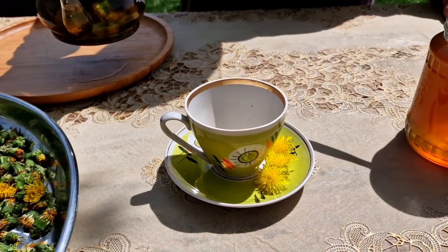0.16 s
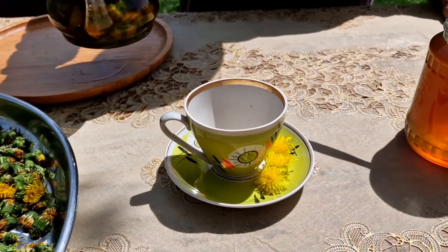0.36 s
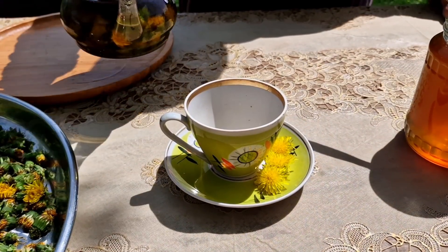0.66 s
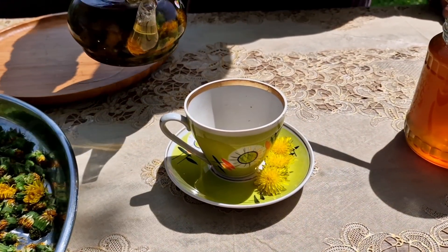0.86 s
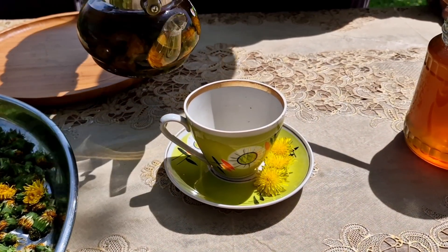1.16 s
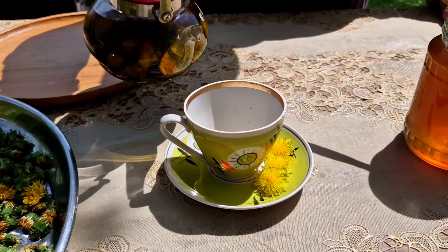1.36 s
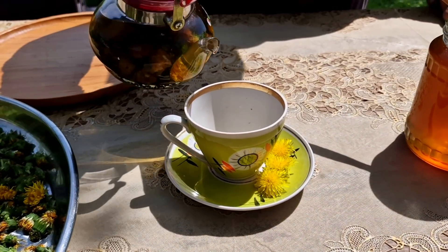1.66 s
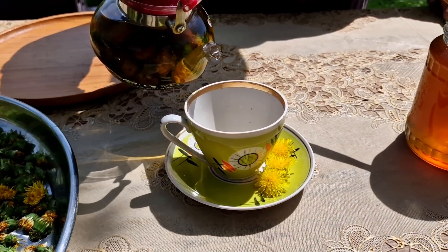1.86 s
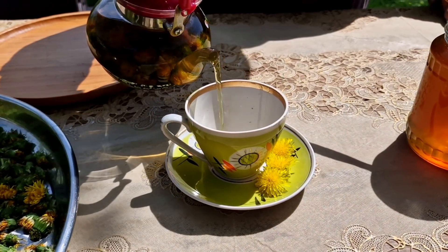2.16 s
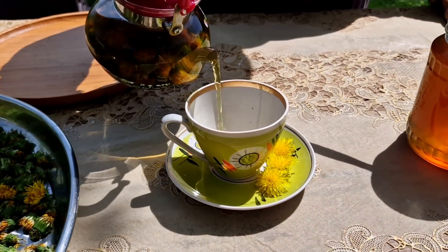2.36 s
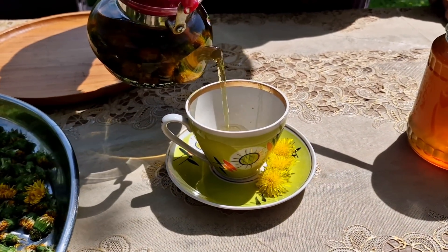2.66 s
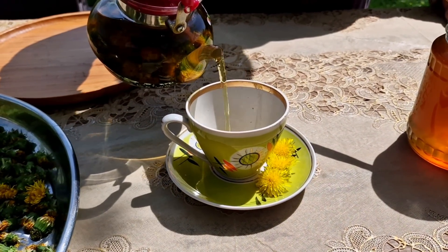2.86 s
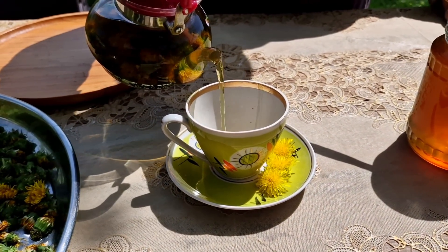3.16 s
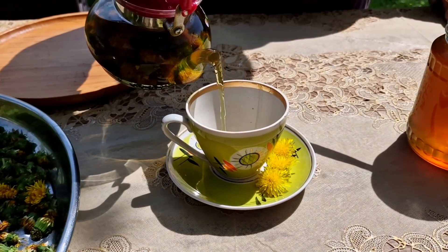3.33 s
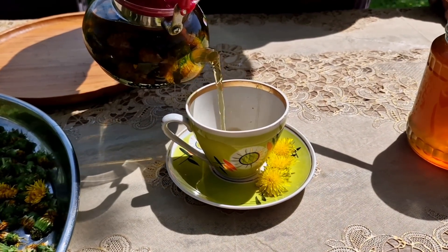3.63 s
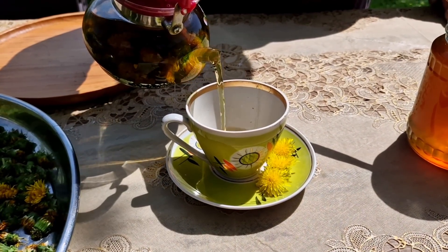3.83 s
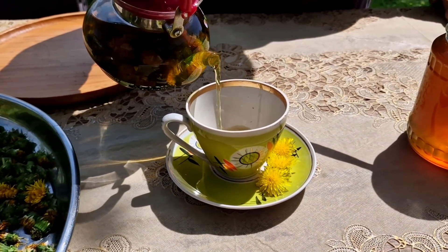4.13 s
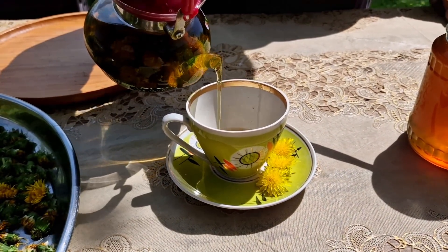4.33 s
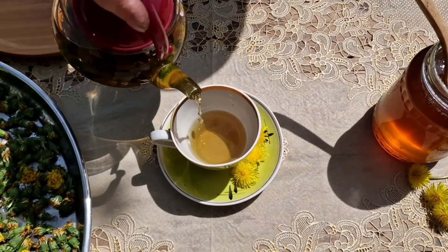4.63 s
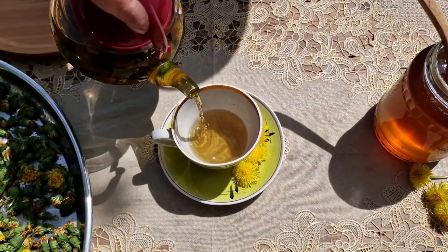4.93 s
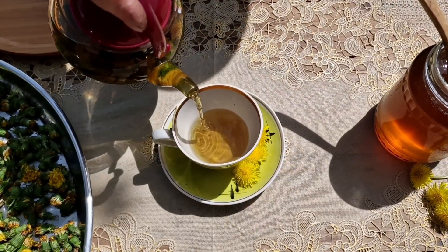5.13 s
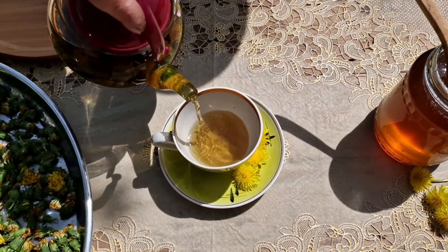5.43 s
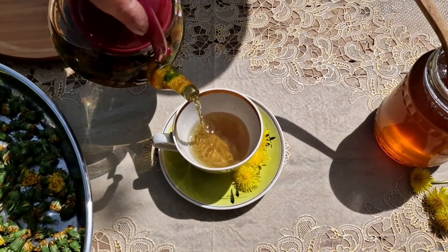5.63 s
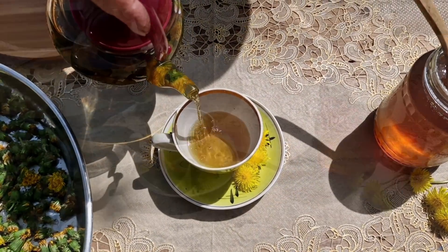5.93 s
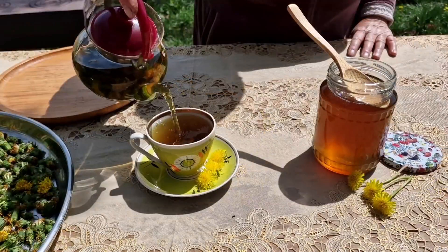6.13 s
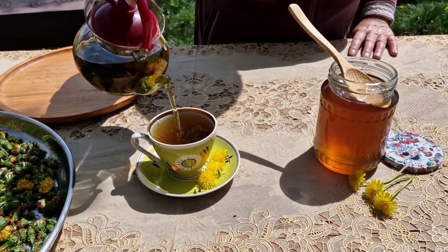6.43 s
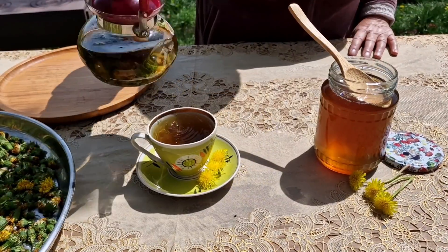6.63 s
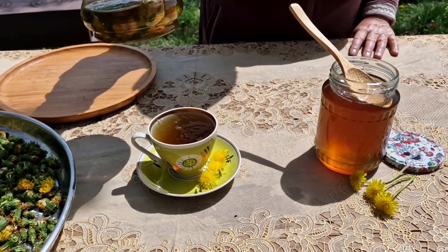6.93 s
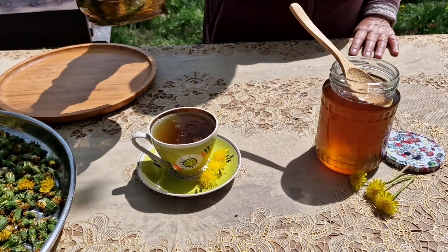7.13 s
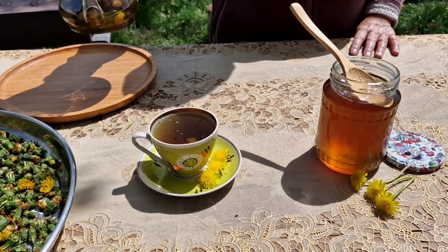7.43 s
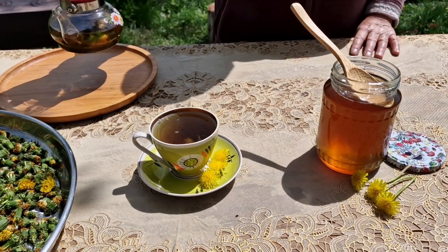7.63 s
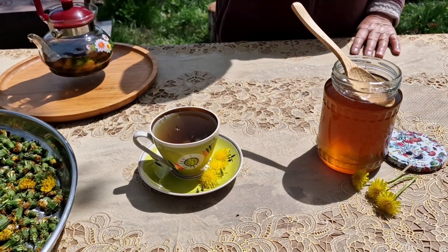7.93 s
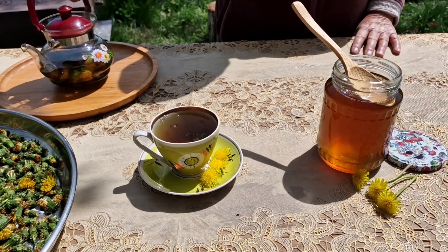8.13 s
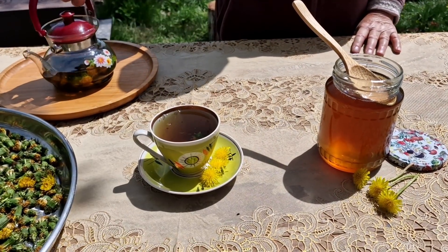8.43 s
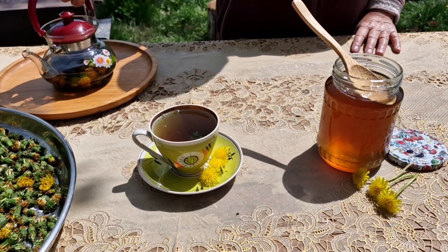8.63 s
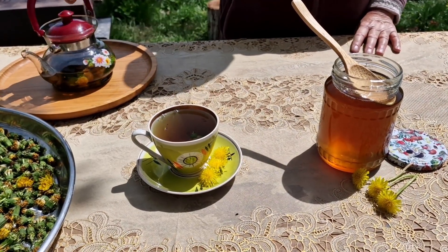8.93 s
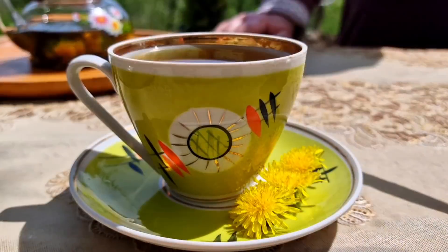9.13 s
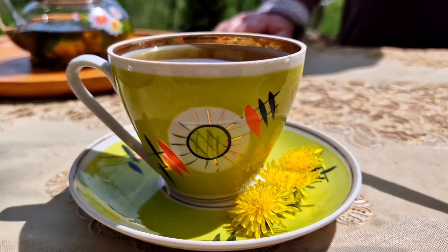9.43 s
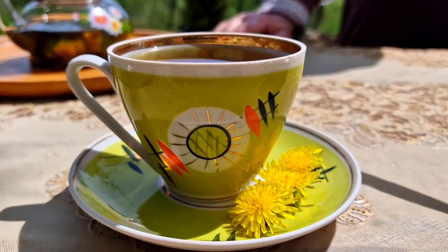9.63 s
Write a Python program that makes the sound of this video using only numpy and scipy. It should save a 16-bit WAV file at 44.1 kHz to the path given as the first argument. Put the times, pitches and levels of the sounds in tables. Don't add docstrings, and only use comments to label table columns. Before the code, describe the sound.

A stereo microphone by the table in a sunny rural yard picks up lumpy low wind, faint hum and distant bird chorus. Bright sparrow chirps and falling chick peeps surround a rasping rooster crow, answered faintly from afar. Small sharp drips ring in a porcelain cup, followed by delicate trickling and one final plop. Late on, a dull wooden knock comes, then harsh scolding on the right and a fast high trill.

```python
import sys
import numpy as np
from scipy import signal
from scipy.fft import rfft, irfft
from scipy.io import wavfile
from scipy.ndimage import uniform_filter1d

SR = 44100
rng = np.random.default_rng(int(sys.argv[2]) if len(sys.argv) > 2 else 0)


def unload_audio(sound):
    columns = np.transpose(np.atleast_2d(sound))
    steps = np.round(np.clip(columns, -1, 1) * 32767)
    wavfile.write(sys.argv[1], SR, steps.astype(np.int16))


def natural_amplitude(level_db):
    exponent = np.asarray(level_db, float) / 20
    return 10 ** exponent


N = 431298


def evened(x):
    return x / np.sqrt(np.mean(x ** 2) + 1e-20)


def read(points, hz):
    f, value = np.transpose(points)
    return np.interp(np.log(hz + 1), np.log(f + 1), value)


def curves(rows):
    s, *columns = np.transpose(rows)
    t = np.arange(s[0], s[-1], 1 / SR)
    return t, *(np.interp(t, s, c) for c in columns)


def add(mix, s, sound, pan_db=0, lag=0):
    for ear, sign in enumerate((1, -1)):
        part = mix[ear, round(s * SR) - sign * lag:][:len(sound)]
        part += sound[:len(part)] * natural_amplitude(sign * pan_db / 2)


def drift(size, hz):
    lowpass = signal.butter(2, hz, fs=SR, output="sos")
    return evened(signal.sosfilt(lowpass, rng.standard_normal(size)))


def noise(db, window, top_hz=SR / 2):
    # (frequency [Hz], likeness [0-1])
    likeness = [(30, 0.7), (70, 0.93), (200, 0.67), (600, 0.036), (1200, 0.024), (5000, 0.1)]
    hop = window // 4
    frames = N // hop + 5
    hz = np.fft.rfftfreq(window, 1 / SR)[:, None]
    used = hz[hz <= top_hz][:, None]
    a, b, c, d, patches = rng.standard_normal((frames, len(used), 5)).T
    patches = uniform_filter1d(patches, size=10, axis=0)
    patches = evened(uniform_filter1d(patches, size=8, axis=1))
    same = np.clip(read(likeness, used), -1, 1)
    left = a + 1j * b
    right = same * left + np.sqrt(1 - same ** 2) * (c + 1j * d)
    z = np.zeros((2, len(hz), frames), complex)
    z[:, :len(used)] = left, right
    z[:, :len(used)] *= natural_amplitude(db(used, np.arange(frames) * hop / SR) + .7 * patches)
    return signal.istft(z, nperseg=window, noverlap=window - hop)[1][:, :N]


def echoes(x, t60, gap_s):
    at = np.arange(round(gap_s * SR), SR // 3, 16)
    at = at + rng.integers(0, 16, (2, len(at)))
    taps = np.zeros((2, SR // 3 + 16))
    heights = rng.choice([-1., 1.], at.shape) * natural_amplitude(-60 * at / SR / t60)
    np.put_along_axis(taps, at, heights, 1)
    return signal.oaconvolve(x[:1], taps / np.linalg.norm(taps[0]), axes=1)[:, :x.shape[1]]


def note(start, length, first_hz, last_hz, db, bend=1., arch=0., edge_db=-.5):
    top_share = .37
    u = np.linspace(0, 1, num=16)
    top = top_share * (arch > 0)
    past = np.clip((u - top) / (1 - top), 0, 1)
    hz = last_hz + (first_hz - last_hz) * (1 - past) ** bend
    hz -= arch * first_hz * np.maximum(1 - u / top_share, 0) ** 2
    return np.transpose([start + length * u, hz, db + edge_db * (2 * u - 1) ** 4])


def whistle(rows, waver, second_db, hook=0., throb_hz=0., catch=0.):
    t, hz, level_db = curves(rows)
    hz = uniform_filter1d(hz, size=300) * (1 - hook * np.exp((t - t[-1]) / 0.01))
    turn = 2 * np.pi * np.cumsum(hz * (1 + waver * drift(len(t), 80))) / SR
    tone = np.sin(turn) + natural_amplitude(second_db) * np.sin(2 * turn)
    tone *= abs(np.cos(np.pi * throb_hz * (t - t[0] - .04))) ** .9
    tone *= 1 - catch * np.exp(-((t[-1] - t - .036) / 0.0015) ** 2)
    level = np.sqrt(2) * natural_amplitude(level_db + 3.85 * drift(len(t), 26))
    return t[0], level * tone * signal.windows.tukey(len(t), .15)


def wind():
    # (time [s], level [dB])
    gusts = [(0, -40.5), (.1, -55.5), (1.06, -61), (1.22, -52.5), (2.8, -62.5), (3.12, -49.5), (3.3, -58.5),
             (4.55, -49.5), (4.74, -34), (5.15, -65.5), (5.5, -50.5), (6.43, -53.5), (6.56, -44),
             (7.44, -54.5), (8.5, -45), (8.6, -53.5), (9.78, -53.5)]
    # (frequency [Hz], density [dB per Hz])
    rumble_curve = [(7.1, -44.5), (12, -14.5), (43, 8), (69, -2), (123, -16.5), (200, -32), (260, -25),
                    (440, -120)]
    s, level_db = np.transpose(gusts)
    rumble = evened(noise(lambda hz, t: read(rumble_curve, hz) + 0 * t, 4096, top_hz=500))
    gust_db = np.interp(np.arange(N) / SR, s, level_db)
    return rumble * natural_amplitude(gust_db + 2.9 * drift(N, 10.0)) * natural_amplitude([[.6], [-.6]])


def yard():
    # (start [s], far hum [dB], far bird chorus [dB])
    stretches = [
        (0, -72.5, -91.5),
        (4.4, -72.5, -87),
        (6.0, -69.5, -87),
        (9.0, -65, -84.5),
    ]
    # (frequency [Hz], density [dB per Hz])
    hum_curve = [(60, -16), (130, 1.5), (280, -2.5), (500, -6.5), (900, -12.5), (2000, -62)]
    chorus_curve = [(1200, -100.5), (2000, 8), (2600, 1.5), (3700, 7.5), (4600, -4.5), (5500, -4.5),
                    (8000, -23)]
    rustle_curve = [(100, -9), (400, -10), (1200, 3.5), (2200, -2), (4500, -30), (6000, -13), (8000, -11),
                    (9300, -23.5), (11000, -27), (12500, -20.5), (15600, -27.5), (15850, -71)]
    s, hum_db, chorus_db = np.transpose(stretches)
    fade_s = 0.058

    def stepped(t, db):
        changes = zip(s[1:], np.diff(db))
        return db[0] + sum(step * np.clip((t - at) / fade_s, 0, 1) for at, step in changes)

    def level_db(hz, t):
        hum = natural_amplitude(read(hum_curve, hz) + stepped(t, hum_db) - 5)
        chorus = natural_amplitude(read(chorus_curve, hz) + stepped(t, chorus_db) - 3.5)
        rustle = natural_amplitude(read(rustle_curve, hz) - 89.0)
        return 10 * np.log10(hum ** 2 + chorus ** 2 + rustle ** 2)
    return noise(level_db, 1024) * natural_amplitude([[.7], [-.7]])


def drones():
    # (start [s], end [s], frequency [Hz], level [dB], waver [share of pitch])
    tones = [
        (9.0, 9.77, 37, -49, .03),
        (4.42, 5.9, 465, -81, .03),
        (9.05, 9.77, 500, -78, .02),
        (6.1, 9.0, 7950, -97, .003),
    ]
    out = np.zeros((2, N))
    for start, end, hz, db, waver in tones:
        add(out, *whistle([(start, hz, db), (end, hz, db)], waver, second_db=-55))
    return out


def twitter():
    # (time [s], share calling [relative])
    calling = [(0, .3), (2.4, .5), (4.6, .4), (6.3, .8), (7.2, 1.5), (8.6, 1.2), (9.78, .6)]
    out = np.zeros((2, N))
    s, share = np.transpose(calling)
    for when, keep, pitch, glide, length, loud, side in rng.random((150, 7)):
        start = when * 9.6
        if keep * 1.5 < np.interp(start, s, share):
            hz, db = 3100 + 1700 * pitch, -77 + 8 * loud
            end = start + .01 + .02 * length
            rows = [(start, hz, db), (end, hz * (.65 + .4 * glide), db - 4)]
            add(out, *whistle(rows, waver=.05, second_db=-40), pan_db=8 * side - 4)
    return out


def tweets():
    # (start [s], length [s], first pitch [Hz], last pitch [Hz], level [dB])
    rows = [(.781, 0.065, 3500, 3950, -67.5), (.891, 0.048, 3660, 4360, -68.5),
            (.981, 0.18, 3590, 3626, -65), (1.241, 0.078, 5740, 3820, -69.5),
            (1.701, 0.05, 4880, 4700, -66.5), (1.755, 0.032, 4740, 3470, -66), (1.796, .1, 3350, 3405, -64),
            (2.18, 0.04, 4850, 4740, -67), (2.69, .07, 5500, 4900, -70), (5.135, 0.047, 7600, 5560, -71),
            (5.94, 0.028, 6000, 4860, -70), (7.14, .1, 4050, 4100, -70), (7.18, 0.13, 3470, 2870, -68),
            (7.57, .06, 3200, 3400, -71), (7.61, .07, 4200, 4150, -71), (8.5, .08, 4150, 4100, -73),
            (8.68, .03, 2050, 2050, -70), (8.92, .07, 4150, 4150, -70)]
    out = np.zeros((2, N))
    for row in rows:
        add(out, *whistle(note(*row), waver=.012, second_db=-40), lag=1)
    return out


def far_crows():
    # (start [s], length [s], first pitch [Hz], last pitch [Hz], level [dB])
    throbbing = [
        (2.473, 0.377, 587, 605, -62),
        (4.074, 0.337, 583, 597, -60.5),
    ]
    wavering = [
        (3.7, 0.098, 723, 668, -60),
        (6.37, 0.303, 708, 697, -73.5),
        (8.12, 0.36, 690, 686, -76.5),
    ]
    low, high = np.zeros((2, 2, N))
    for row in throbbing:
        add(low, *whistle(note(*row, edge_db=-1.5), waver=.008, second_db=-40, throb_hz=11.))
    for row in wavering:
        add(high, *whistle(note(*row, edge_db=10.5), waver=0.032, second_db=-68))
    return low, high


def trill(rows):
    t, hz, level_db = curves(rows)
    wobbles_per_s, wobble_top_s = 21.7, 9.065
    beat = 2 * np.pi * wobbles_per_s * (t - wobble_top_s) + 0.25 * drift(len(t), 11)
    low_hz = hz + 270 * np.cos(beat) - 500 * np.exp((t - t[-1]) / 0.011)
    middle_hz = 7600 + 90 * drift(len(t), 60)
    high_hz = 8250 - 300 * np.sin(beat)
    low, middle, high = (np.sin(2 * np.pi * np.cumsum(f) / SR) for f in (low_hz, middle_hz, high_hz))
    middle *= np.maximum(np.cos(beat + 2.2), 0) ** 2
    high *= np.maximum(np.cos(beat - .6), 0) ** 2
    voice = low + (.7 * middle + .6 * high) * natural_amplitude(4 * drift(len(t), 30))
    return t[0], natural_amplitude(level_db + 3.5 * drift(len(t), 25)) * voice * signal.windows.tukey(len(t), .2)


def trills():
    # (start [s], length [s], level [dB])
    rows = [
        (6.949, 0.13, -69),
        (9.035, 0.303, -50.5),
    ]
    layers = np.zeros((2, 2, N))
    for layer, (start, length, db) in zip(layers, rows):
        add(layer, *trill(note(start, length, 6825, 6825, db)), pan_db=4, lag=1)
    return layers


def near_whistles():
    # (start [s], length [s], first or top pitch [Hz], last pitch [Hz], level [dB])
    peeps = [(.63, 0.1, 2170, 1850, -65), (.93, 0.075, 2336, 2264, -66.5), (1.25, 0.021, 3166, 3030, -68),
             (1.384, 0.025, 3060, 2990, -66.5), (1.47, 0.044, 2950, 3720, -69),
             (1.52, 0.028, 3050, 2980, -67), (1.808, 0.17, 2100, 2810, -71.5),
             (2.209, 0.076, 2740, 2230, -70.5), (5.2, 0.033, 1805, 2290, -59.5),
             (5.33, 0.084, 2300, 2130, -66.5), (5.58, 0.042, 2210, 2053, -64),
             (5.84, 0.087, 2470, 2220, -67.5), (6.42, 0.063, 2700, 2250, -59),
             (6.72, 0.0985, 2920, 2325, -61), (6.849, 0.13, 3010, 2530, -60),
             (6.895, 0.0896, 2450, 2260, -59.5), (7.339, 0.11, 2570, 2364, -64.5),
             (7.447, 0.16, 3080, 3260, -74)]
    chicks = [(2.021, 0.066, 2886, 2636, -65), (2.431, 0.088, 2960, 2400, -62),
              (2.65, 0.14, 3370, 2465, -56.5), (2.922, 0.079, 3250, 2580, -61),
              (3.002, 0.11, 3092, 2572, -50), (6.038, 0.1, 3290, 2552, -46),
              (6.62, .125, 3598, 2530, -46.5), (6.957, 0.11, 3630, 2688, -46),
              (7.292, 0.081, 2570, 2323, -57)]
    arches = [(1.605, 0.17, 2653, 2388, -68), (3.163, 0.054, 3150, 2430, -59.5),
              (7.628, 0.1174, 2802, 2455, -57.5), (8.272, 0.0992, 2396, 2230, -61),
              (9.021, 0.075, 3360, 3370, -55.5), (9.311, 0.097, 3370, 3250, -53),
              (9.463, 0.135, 2436, 2130, -67.5), (9.5, 0.052, 2850, 2740, -67),
              (6.551, 0.094, 2525, 2196, -59.5), (9.585, 0.1, 3250, 3270, -59)]
    out = np.zeros((2, N))
    for row in peeps:
        add(out, *whistle(note(*row), waver=0.00867, second_db=-33, hook=0.07), lag=-8)
    for row in chicks:
        rows = note(*row, bend=5.5, edge_db=-8)
        add(out, *whistle(rows, waver=.01, second_db=-42, hook=.27, catch=.8), lag=-8)
    for row in arches:
        rows = note(*row, arch=.1095)
        add(out, *whistle(rows, waver=0.0027, second_db=-13.0, hook=0.176), lag=-2)
    return out


def scold():
    length_s = .04
    t = np.arange(round(length_s * SR)) / SR
    hz = 1850 + 400 * np.sin(np.pi * t / length_s)
    turn = 2 * np.pi * np.cumsum(hz * (1 + .09 * drift(len(t), 500))) / SR
    stack = .7 * np.sin(turn) + .4 * np.sin(1.5 * turn) + np.sin(2 * turn) + .35 * np.sin(2.5 * turn)
    return .45 * stack * (1 + .6 * drift(len(t), 400)) * np.sin(np.pi * (t / length_s) ** .7)


def scolds():
    # (time [s], peak [dB], left-right [dB])
    rows = [
        (9.079, -42.5, -11.5),
        (9.195, -38, -15.5),
    ]
    out = np.zeros((2, N))
    for s, peak_db, pan_db in rows:
        add(out, s, natural_amplitude(peak_db) * scold(), pan_db, lag=-2)
    return out


LEAD_S = .005


def chirp(tune, stretch):
    # (time from onset [s], pitch [Hz], level [dB])
    shape = [(0, 2997, -24.5), (.006, 4354, -2.5), (.0095, 5128, -13.5), (.013, 4253, -3),
             (.016, 3623, -7.5), (.0195, 4544, -14), (.025, 3400, -4), (.036, 3850, -14.5), (.05, 2636, -5)]
    t, hz, level_db = curves(np.multiply(shape, (stretch, 1, 1)))
    hz = uniform_filter1d(hz, size=60) * tune * (1 + 0.025 * drift(len(t), 400))
    turn = 2 * np.pi * np.cumsum(hz) / SR
    lift = np.exp(-((2 * hz - 8500) / 700) ** 2 - ((t - .015 * stretch) / .005) ** 2)
    octave = natural_amplitude(-21) * lift + natural_amplitude(-42)
    body = np.sin(turn) + octave * np.sin(2 * turn)
    body *= natural_amplitude(level_db + 2.5 * drift(len(t), 250)) * signal.windows.tukey(len(t), .1)
    u = np.arange(round(3 * LEAD_S * SR)) / SR / LEAD_S
    lead_hz = tune * (5000 + 1500 * (u % 1) + 250 * u) * (1 + 0.017 * drift(len(u), 730))
    lead = np.sin(2 * np.pi * np.cumsum(lead_hz) / SR)
    lead *= natural_amplitude(-26) * np.sin(np.pi * u) ** 2 * u / 2
    out = np.r_[np.zeros(len(u) // 3), body]
    out[:len(u)] += lead
    return out


def sparrow():
    # (time [s], peak [dB], left-right [dB], pitch factor [1], stretch in time [1])
    seen = [(0.379, -34, -1.5, 1.016, 0.99), (1.921, -31, -1.5, 1.04, 0.86),
            (2.805, -31.5, -4.5, 1.008, 1.04), (3.712, -30, -2.5, 1.06, 0.73), (4.935, -31, -7, 1.02, 1.01),
            (5.672, -31.5, 10.5, 1.038, 0.9), (6.417, -39, 0, 1.105, 1.06)]
    # (time [s], peak [dB], pitch factor [1], stretch in time [1])
    hidden = [(2.07, -54.5, 1, 1.8), (2.165, -47.5, 0.99, 2.18), (2.25, -59, .95, 2.3),
              (2.469, -60.5, 0.96, 1.4), (3.022, -55.5, 0.94, 1.64), (5.19, -45, 1.2, 1.04),
              (7.271, -68, 1.2, 0.92), (7.43, -68, 0.94, 0.75), (7.54, -77, 1.1, 1.5),
              (7.871, -58, 0.85, 0.41), (7.951, -64, 1.01, 2), (8.018, -52.5, 0.99, 1.66),
              (8.582, -42, 1.077, 1.23), (8.834, -50.5, 0.96, 1.23)]
    out = np.zeros((2, N))
    rows = [(*row, 0) for row in seen]
    rows += [(s, db, 0, tune, stretch, -12) for s, db, tune, stretch in hidden]
    for s, peak_db, pan_db, tune, stretch, direct_db in rows:
        call = np.zeros((2, SR // 2))
        add(call, .001, chirp(tune, stretch), lag=12 if pan_db > 0 else -11)
        tails = natural_amplitude(2.5) * echoes(call, t60=0.23, gap_s=.004)
        tails += natural_amplitude(-8) * echoes(call, t60=0.55, gap_s=.02)
        direct = call * natural_amplitude([[pan_db / 2], [-pan_db / 2]]) * natural_amplitude(direct_db)
        out[:, round((s - .001 - LEAD_S) * SR):][:, :SR // 2] += natural_amplitude(peak_db) * (direct + tails)
    return out


def hisses():
    # (start [s], length [s], level [dB])
    puffs = [(3.3, .08, -89), (3.65, .11, -84), (3.945, .08, -84), (4.12, .08, -86), (5.848, .024, -76),
             (6.615, .008, -55), (6.62, .05, -74)]
    band = signal.butter(5, (11600, 15600), "band", fs=SR, output="sos")
    out = np.zeros((2, N))
    for s, length, db in puffs:
        puff = evened(signal.sosfilt(band, rng.standard_normal(round(length * SR))))
        add(out, s, natural_amplitude(db) * puff * signal.windows.tukey(len(puff), .9), pan_db=20)
    return out


def ticks():
    # (time [s], peak [dB], brightest frequency [Hz], left-right [dB])
    clicks = [(3.087, -57, 10200, 18), (3.219, -54, 9050, 13), (4.198, -30, 4000, 14.5),
              (4.357, -49, 8514, 11), (4.682, -50, 8050, 3.5), (4.718, -45, 7950, -5),
              (4.734, -37.5, 7000, 9), (4.904, -46, 7350, 0), (6.662, -36, 8450, 11)]
    out = np.zeros((2, N))
    t = np.arange(200) / SR
    for s, peak_db, hz, pan_db in clicks:
        click = np.sin(2 * np.pi * hz * t) * np.exp(-t * hz * 0.43)
        click += 0.15 * rng.standard_normal(len(t)) * np.exp(-t / 0.0024)
        add(out, s, natural_amplitude(peak_db) * click, pan_db, lag=3)
    return out


def drop(peak_db, hz, t60, tick_db):
    t = np.arange(round(.2 * SR)) / SR
    ring = np.sin(2 * np.pi * hz * t) * natural_amplitude(-60 * t / t60) * (1 - np.exp(-t / 0.00045))
    burst = rng.standard_normal(len(t)) * np.exp(-t / 0.00081)
    tick = signal.lfilter([1, -1], [1, -1.35, .55], burst)
    return natural_amplitude(peak_db) * (ring + 0.6 * natural_amplitude(tick_db) * tick)


def trickle():
    out = np.zeros((2, N))
    for when, pitch, loud in rng.random((70, 3)):
        add(out, 5.2 + .72 * when, drop(-68 + 9 * loud, 700 + 1500 * pitch, .018, -20))
    return out


def drops():
    # (time [s], peak [dB], ring frequency [Hz], t60 [s], left-right [dB])
    plops = [(3.2192, -23.5, 3920, .004, -12), (3.339, -35, 3960, 0.011, 8), (3.397, -52, 3700, .008, 0),
             (3.497, -48, 3400, .012, 0), (4.127, -42, 4200, .008, -2), (4.170, -41, 3300, .008, -4),
             (4.198, -24, 3200, .008, -4), (4.1978, -19, 1300, 0.03, 2), (4.245, -38, 1051, 0.025, 0),
             (4.326, -37, 3200, .008, -4), (4.342, -40, 3400, .008, -4), (4.6811, -42, 1370, 0.011, 2),
             (4.7182, -29, 3570, 0.014, -4), (4.7335, -34, 3300, .008, 4), (4.7323, -48, 3230, 0.16, 5),
             (4.7337, -30, 1374, 0.014, -4), (4.888, -40, 1420, 0.05, -2.1), (5, -30, 2120, 0.006, .5),
             (5.0765, -46, 1950, .02, .5), (5.077, -41.5, 1494, 0.044, .5), (5.0985, -46, 1480, .02, 0),
             (5.099, -42, 1900, .025, 0), (5.117, -52, 1950, .015, 0), (5.1615, -42, 1930, .02, 3),
             (5.162, -37.5, 1520, .023, 3), (5.479, -48, 1454, 0.035, 3), (6.662, -25.5, 1674, 0.022, -2.5)]
    # (start [s], length [s], first pitch [Hz], last pitch [Hz], level [dB])
    bubbles = [
        (4.901, .013, 1750, 3300, -56),
        (4.718, .016, 1100, 1400, -58),
    ]
    out = np.zeros((2, N))
    for s, peak_db, hz, t60, pan_db in plops:
        tick_db = -33 + 0.49 * (peak_db + 33.0) + 30 * np.log10(min(t60 / .012, 1))
        add(out, s, drop(peak_db, hz, t60, tick_db), pan_db, lag=3)
    for row in bubbles:
        add(out, *whistle(note(*row), waver=.004, second_db=-40), lag=3)
    return out


def thud():
    # (time [s], peak [dB])
    landings = [
        (8.467, -19),
    ]
    # (frequency [Hz], level [dB], t60 [s])
    modes = [(98, -10.5, 0.19), (245, 1, 0.09), (330, 3.5, 0.05), (410, -14.5, 0.16), (480, -12.5, 0.12),
             (630, -1.5, 0.054), (980, -10.5, 0.037), (1550, -8, 0.009)]
    out = np.zeros((2, N))
    t = np.arange(round(.3 * SR)) / SR
    for s, peak_db in landings:
        body = sum(natural_amplitude(db - 60 * t / t60) * np.sin(2 * np.pi * hz * t) for hz, db, t60 in modes)
        body *= 1 - np.exp(-t / .0008)
        tick = signal.lfilter([.05], [1, -1.6, .66], rng.standard_normal(len(t)))
        knock = body / abs(body).max() + 0.056 * tick * np.exp(-t / 0.018)
        add(out, s, natural_amplitude(peak_db) * knock, 1.5)
    return out


def crow_controls():
    # (time [s], pitch [Hz], effort [dB], roughness [0-1])
    syllables = [
        [(3.2, 627, -89, 0.3), (3.235, 626.4, -62, 0.3), (3.265, 648, -47.5, 0.2), (3.285, 665, -51.5, .15)],
        [(3.298, 747.2, -38.5, 0.43), (3.335, 753, -43, 0.55), (3.36, 742.3, -39.5, 0.55),
         (3.43, 745, -45, 0.65), (3.465, 732, -56.5, 0.6), (3.52, 740, -56.5, .4)],
        [(3.545, 749, -47.5, 0.63), (3.565, 769, -42, 0.54), (3.585, 788, -42.5, 0.15),
         (3.635, 787.4, -41, .06), (3.665, 806, -38, 0.28), (3.7, 815, -42.5, 0.33), (3.73, 771.5, -44, 0.56),
         (3.77, 750, -50, 0.57)],
        [(3.8, 758.5, -41.5, 0.37), (3.85, 779.3, -41.5, 0.34), (3.9, 782.7, -40.5, 0.08),
         (4.035, 791.8, -41, 0.03), (4.065, 781, -40, 0.45), (4.32, 787.5, -41, 0.44), (4.37, 768, -47.5, 0.63),
         (4.44, 771, -53, 0.54), (4.5, 750, -75, .3)],
    ]
    t, hz, effort_db, rough = curves(np.concatenate(syllables))
    rough = np.clip(rough, 0, .75)
    beak = np.interp(t, (3.5, 3.57), (0, 1))
    weak = np.clip(1.02 - 1.1 * rough, 0, 1) * (.35 + .65 * beak)
    return t, effort_db, uniform_filter1d(hz, size=300), rough, weak, beak


def crow():
    # (frequency [Hz], level [dB])
    open_throat = [(400, -54.5), (790, -8), (1150, -30), (1570, 6), (1970, -2.5), (2370, -6), (2760, -17),
                   (3150, -6), (3550, -19), (3950, -11), (4450, -36), (5100, -27), (6300, -17),
                   (8000, -26.5), (9300, -36.5)]
    shut_throat = [(400, -47), (700, -23), (1050, -30), (1490, 3.5), (1950, -11), (2500, -22), (2900, -16),
                   (3600, -44), (4300, -49), (5100, -19), (6600, -25), (7700, -56.5), (8800, -10),
                   (9600, -62)]
    t, effort_db, hz, rough, weak, beak = crow_controls()
    turn = np.pi * np.cumsum(hz) / SR

    slow = 2 * np.pi * np.cumsum(108 * (1 + .1 * drift(len(t), 12))) / SR
    flutter = 1.1 * rough * np.sin(slow)
    shake = rough * drift(len(t), 60) * .22 + .03 * drift(len(t), 150) + flutter / 4

    def throat(f):
        return natural_amplitude(beak * read(open_throat, f) + (1 - beak) * read(shut_throat, f))

    beats = np.cumsum(np.interp(beak, (0, 1), (45.5, 32.5))) / SR
    beats -= np.interp(3.306, t, beats)
    throb_turn = 2 * np.pi * beats + (.2 + .8 * beak) * drift(len(t), 8)
    throb = 1 + 1.3 * rough * np.cos(throb_turn)

    voice = np.zeros(len(t))
    for k in range(3, 24):
        level = (1 - k % 2 * (1 - weak)) * throat(k * hz / 2)
        if k >= 5:
            level = level / throb ** .7
        partial_shake = shake * (.55 if k == 4 else 1)
        voice += level * np.cos(k * (turn + partial_shake) + k * k)
    voice *= 1 - .9 * rough * beak * np.cos(slow)

    clear = (1 - rough) ** 1.5 * np.cos(2 * (turn + shake / 2))
    side_line = .5 * rough * np.cos(2 * (turn + shake) - slow)
    lowest = 1.5 * throat(hz) * (clear + side_line)

    puffs = rfft(rng.standard_normal(len(t)) * (0.46 + np.cos(2 * turn)))
    f = np.fft.rfftfreq(len(t), 1 / SR)
    bands = np.array([f < 4400, (f >= 4400) / (1 + (f / 9800) ** 7)])
    wide = irfft(puffs * natural_amplitude(read(open_throat, f)) * bands, len(t))
    shut = irfft(puffs * natural_amplitude(read(shut_throat, f)) * bands, len(t))
    low, high = evened(beak * wide + (1 - beak) * shut)
    flicker = natural_amplitude(3 * drift(len(t), 150) + 2 * drift(len(t), 9))
    breath = (.07 + .3 * rough) * low + .19 * high / throb ** .8 * flicker

    size = np.sqrt(abs(uniform_filter1d((throb * (voice + lowest)) ** 2, size=4000))) + 1e-9
    effort = natural_amplitude(effort_db + 4.5) * throb
    return t[0], effort * np.array([voice / size + breath, lowest / size])


def rooster():
    out = np.zeros((2, N))
    start, (upper, lowest) = crow()
    add(out, start, upper, pan_db=-.5, lag=9)
    add(out, start, lowest, pan_db=5, lag=6)
    return out


def scene():
    low_crows, high_crows = far_crows()
    far_trill, close_trill = trills()
    far = tweets() + far_trill + twitter()
    near = near_whistles() + scolds() + high_crows
    table = drops() + thud() + low_crows + close_trill
    crowing = rooster()
    out = wind() + yard() + drones() + hisses() + ticks() + trickle() + sparrow()
    out += natural_amplitude(-5) * far + natural_amplitude(2) * echoes(far, t60=.25, gap_s=.005)
    out += near + natural_amplitude(-7) * echoes(near, t60=0.24, gap_s=.012)
    out += natural_amplitude(-15) * np.roll(near, round(.021 * SR), axis=1)[::-1]
    out += table + natural_amplitude(-15) * echoes(table, t60=0.141, gap_s=0.0033)
    out += natural_amplitude(-.5) * crowing + natural_amplitude(-7.5) * echoes(crowing, t60=.22, gap_s=.006)
    return out


def roll_off(x):
    return signal.sosfilt(signal.butter(12, 16490, fs=SR, output="sos"), x)


def record(dry):
    lowpass = signal.firwin(255, 16100, fs=SR)
    mix = signal.oaconvolve(dry, lowpass[None], "same")
    return roll_off(mix)


dry = scene()
out = record(dry)
unload_audio(out)
```